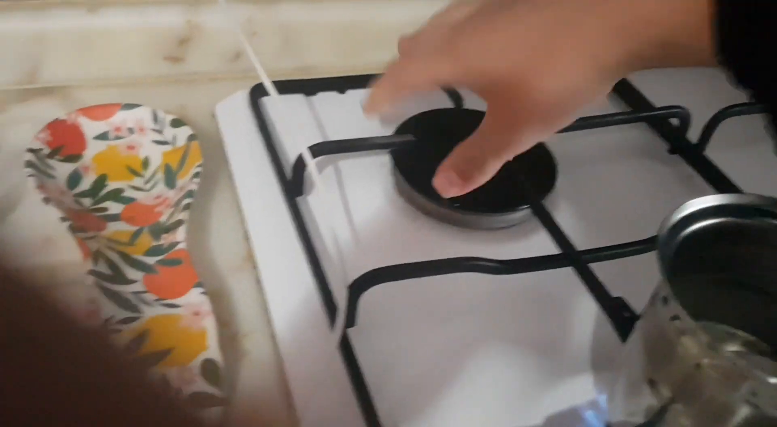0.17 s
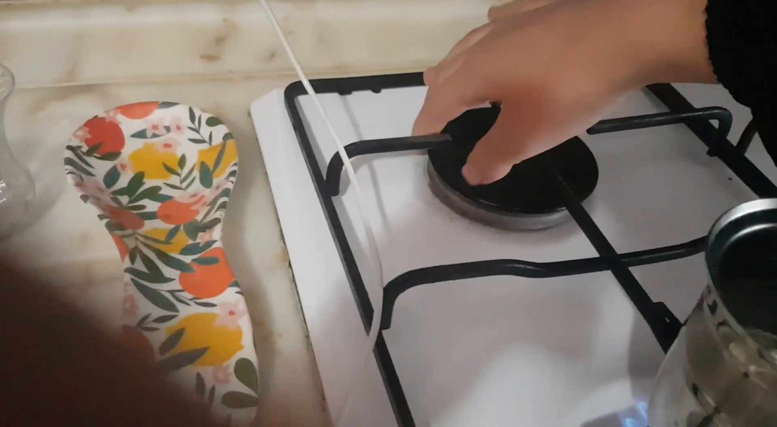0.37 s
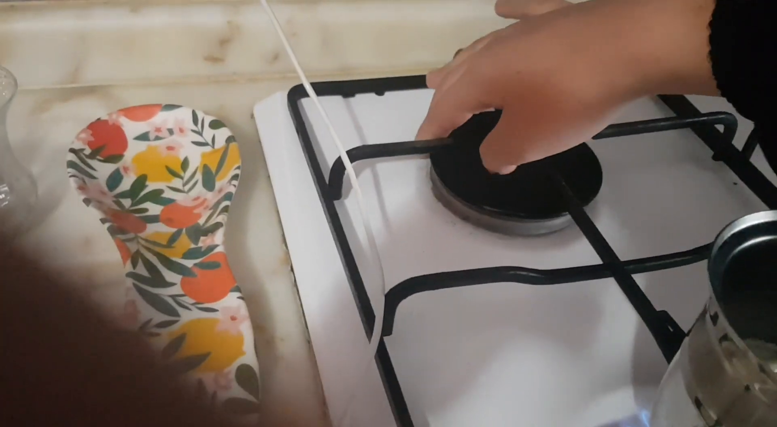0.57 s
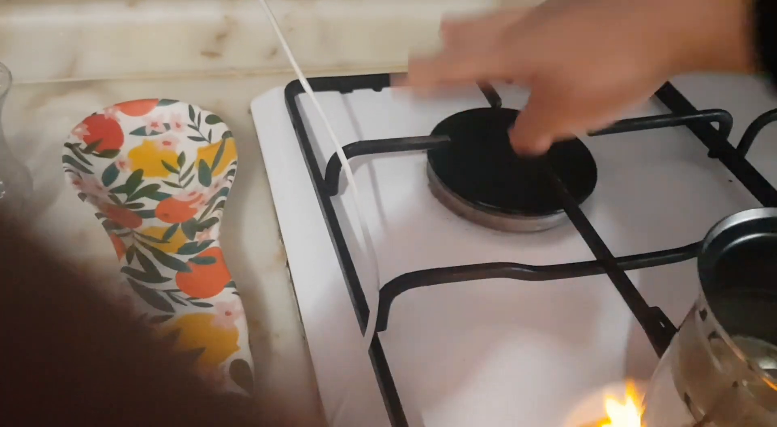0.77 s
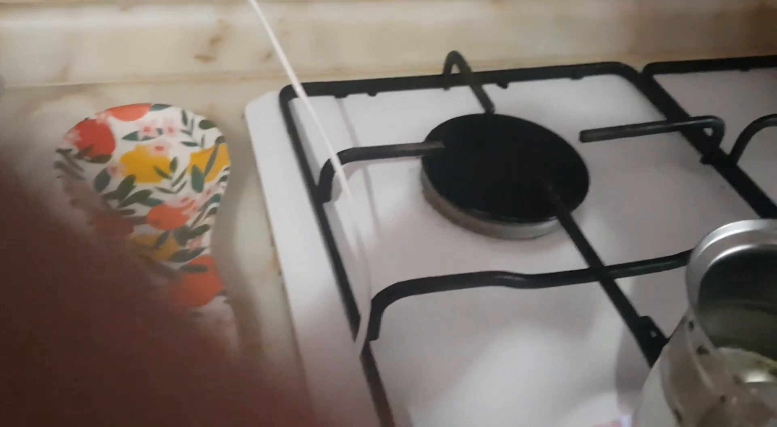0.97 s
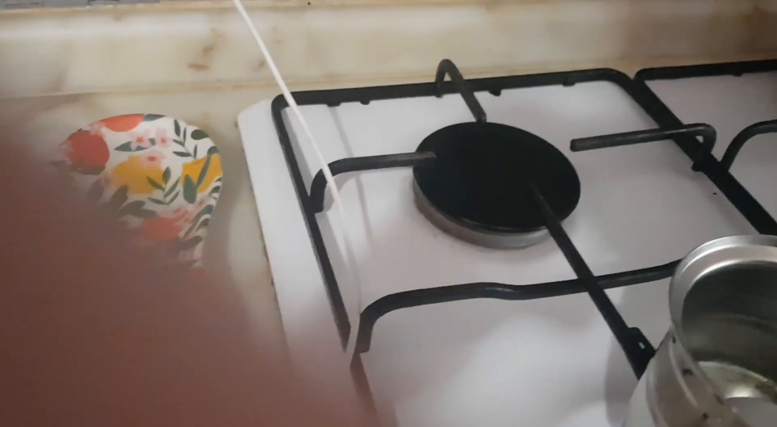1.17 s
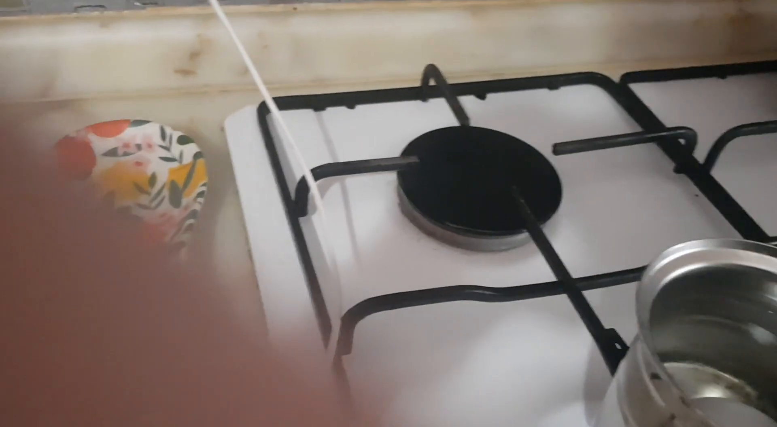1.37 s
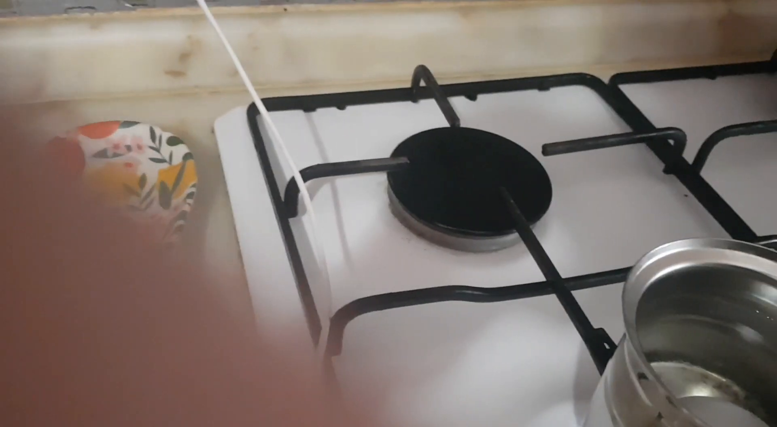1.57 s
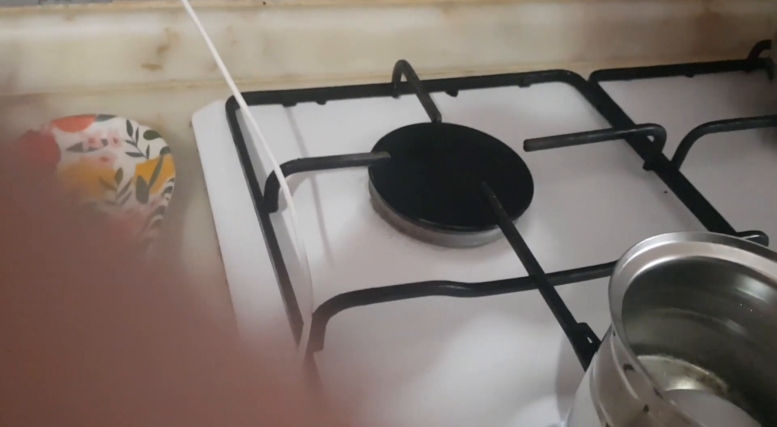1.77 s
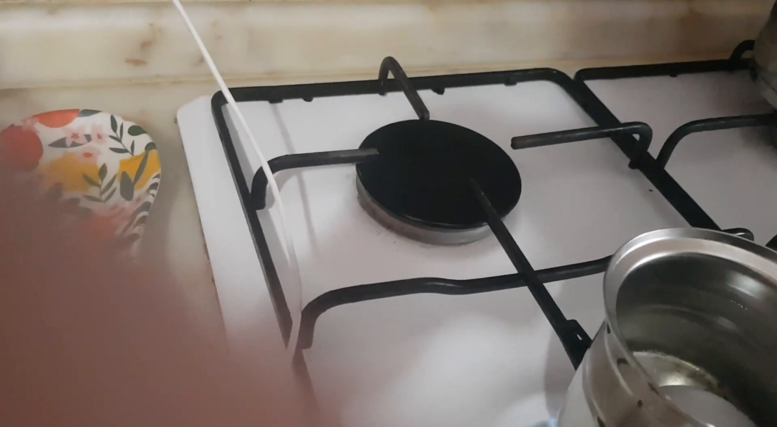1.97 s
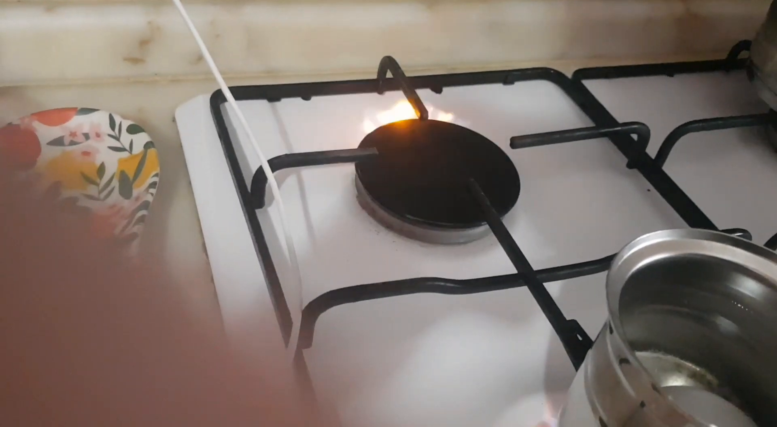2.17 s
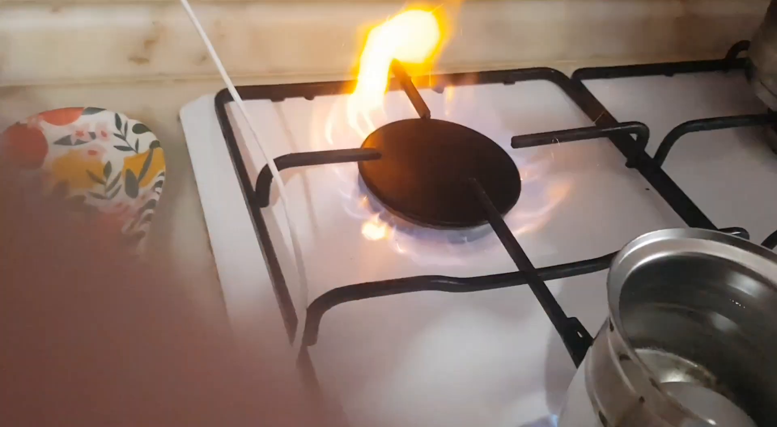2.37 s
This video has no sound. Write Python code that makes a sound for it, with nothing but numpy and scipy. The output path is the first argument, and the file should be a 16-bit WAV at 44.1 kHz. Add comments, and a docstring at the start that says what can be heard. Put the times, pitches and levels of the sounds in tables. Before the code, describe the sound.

Two crisp lighter clicks at a gas burner, heard close in a small quiet kitchen, follow metallic cap knocks, faint knob ticks and a breathy hiss; the gas catches at the second with a fluttering low puff.

```python
"""A small kitchen murmurs, close above a stove, while a hand bumps it: noise with coloured spectra.
A metal cap rocks on a gas burner and drops into its seat: damped modes and dense ringing of cap and hob.
Small knob ticks, then gas hisses with a breathy whistle: broadband jet noise and a resonance of the burner tube.
The spark lighter snaps twice, each a short noise burst with a room tail. At the second snap the gas
lights with a soft whoomp: low noise of evened level under a higher flutter."""
import sys
import numpy as np
from scipy import signal
from scipy.fft import rfft, irfft
from scipy.io import wavfile
from scipy.ndimage import uniform_filter1d

SR = 44100
rng = np.random.default_rng(int(sys.argv[2]) if len(sys.argv) > 2 else 0)


def master_out(mix):
    """Clip the mix to full scale and print it as 16-bit PCM to the path in sys.argv[1]."""
    frames = np.transpose(np.atleast_2d(mix))
    ceiling = np.clip(frames, -1, 1)
    pcm = np.round(ceiling * 32767).astype(np.int16)
    wavfile.write(sys.argv[1], SR, pcm)


N = 106369
T = np.arange(N) / SR  # s
HZ = np.maximum(np.fft.rfftfreq(N, 1 / SR), 1)


def amp(db):
    """Level in decibels to amplitude ratio."""
    return 10 ** (np.asarray(db) / 20)


def over_hz(points, hz=HZ):
    """Interpolation along a logarithmic frequency axis, on which octaves are equal steps."""
    f, value = np.array(sorted(points), float).T
    return np.interp(np.log(hz), np.log(f), value)


def shape(points):
    """Spectral envelope: amplitude per frequency, falling 24 dB per octave past the table's ends."""
    below = np.minimum(HZ / points[0][0], 1) ** 4
    above = np.minimum(points[-1][0] / HZ, 1) ** 4
    return amp(over_hz(points)) * below * above


def hump(hz, octaves):
    """Bandpass envelope: a Gaussian on the octave scale, down to 1/e at this distance from the centre."""
    return np.exp(-(np.log2(HZ / hz) / octaves) ** 2)


# likeness of the two microphone signals: f/Hz, correlation
CHANNEL_CORRELATION = [(60, 0.99), (300, 0.92), (450, 0.87), (630, -0.11), (900, .5), (1200, 0.55),
                       (3000, 0.14), (15000, 0)]


def likeness(hz):
    """Spatial coherence: correlation of left and right at a frequency."""
    return np.clip(over_hz(CHANNEL_CORRELATION, hz), -.99, .99)


def noise(gain):
    """Coloured noise of rms 1: mid and side are weighted to set the correlation of the channels."""
    mid, side = rfft(rng.standard_normal((2, N)))
    alike = likeness(HZ)
    common = mid * np.sqrt(1 + alike)
    opposed = side * np.sqrt(1 - alike) * np.array([[1], [-1]])
    x = irfft(gain * (common + opposed), N)
    return x / x.std()


def decay(age, t60):
    """Exponential damping: the level falls by 60 dB in each t60."""
    return np.exp(-np.log(1000) * age / t60)


def fade(start, t60):
    """Impulsive excitation: sudden onset and exponential decay."""
    return (T >= start) * decay(np.maximum(T - start, 0), t60)


def swell(start, rise, sharpness=1):
    """Transient envelope: a burst that peaks after the rise time and dies away."""
    u = np.maximum(T - start, 0) / rise
    return (u * np.exp(1 - u)) ** sharpness


def ring(gain, start, t60s, size=32768):
    """High modal density: noise in overlapping octave bands, each damped at its own rate."""
    spectrum = rfft(noise(gain)[:, :size])
    hz = np.maximum(np.fft.rfftfreq(size, 1 / SR), 1)
    out, first = np.zeros((2, N + size)), int(start * SR)
    for k in range(5, 15):  # octave centres 32 Hz to 16384 Hz
        band = irfft(spectrum * np.maximum(1 - abs(np.log2(hz) - k), 0), size)
        out[:, first:first + size] += band * decay(T[:size], over_hz(t60s, 2. ** k))
    return out[:, :N]


def chime(modes, start, ring_share=1):
    """Modal superposition: damped sinusoids, their phase lag between microphones set by the correlation."""
    out, age = np.zeros((2, N)), T[T >= start] - start
    for hz, db, t60 in modes:
        lag = rng.choice([-1, 1]) * np.arccos(likeness(hz))
        phase = rng.uniform(-np.pi, np.pi) + lag * np.array([[.5], [-.5]])
        t60 = t60 * ring_share
        t, first = age[age < 2 * t60], N - len(age)
        out[:, first:first + len(t)] += amp(db) * decay(t, t60) * np.sin(2 * np.pi * hz * t + phase)
    return out


# level of the background noise, turned down over time as by a noise suppressor: t/s, level/dB
BACKGROUND_LEVEL = [(0, -49.5), (.7, -49.5), (1.3, -53), (2.0, -55)]
# spectrum of the kitchen's low murmur: f/Hz, relative level/dB
MURMUR_SPECTRUM = [(15, -63), (25, -37), (59, 1.5), (80, 0.5), (97, -9), (153, 0.5), (180, -16),
                   (263, -3.5), (344, -15.5), (405, -10), (439, -16), (575, -17), (863, -40), (2000, -36),
                   (3520, -49.5), (4740, -32.5), (8140, -44.5), (9570, -31.5), (16000, -37.5)]


def murmur():
    """Stationary noise: the kitchen's fixed spectrum, turned down over time as by a noise suppressor."""
    return amp(np.interp(T, *np.array(BACKGROUND_LEVEL).T)) * noise(shape(MURMUR_SPECTRUM))


# dull bumps and rubs of the hand: t/s, level/dB, rise/s, centre f/Hz, 1/e half-width/octaves
HAND_BUMPS = [(0.0, -57.5, 0.026, 970, 1.06), (0.56, -60, 0.043, 1090, 1.83),
              (0.625, -47.5, 0.026, 167.8, 1.5), (1.39, -51, 0.016, 440, 0.57),
              (1.497, -45, 0.021, 238, 1.41), (1.538, -51.5, 0.023, 293, 2.52)]


def hand():
    """Soft contact: the hand brushes and bumps the stove, giving dull noise that swells and dies."""
    out = 0
    for start, db, rise, hz, width in HAND_BUMPS:
        out = out + amp(db) * noise(hump(hz, width)) * swell(start, rise)
    return out


# knocks of the cap on the burner: t/s, level/dB, contact brightness f/Hz, bass cut f/Hz,
# relative crack level/dB, relative level/dB of the cap's own ring, share of its ring time left by the fingers
CAP_KNOCKS = [(0.312, -15, 1600, 90.2, -3, -6.5, .45), (0.333, -24.5, 2600, 85.5, 6.5, -0.5, .45),
              (0.377, -14, 2770, 150, -23, -7.5, .35), (0.3885, -10.5, 2870, 100.4, 12.5, -6, 0.38),
              (0.4478, -15.5, 3148, 200, 9.5, -28, .2), (0.7543, -3.5, 8100, 45, 8, 1, 0.99),
              (0.768, -7, 11000, 120, 1, 5.5, 1)]
# clear modes of the cap: f/Hz, relative level/dB, t60/s when free of the fingers
CAP_RING = [(4492, -38, .2), (4788, -36, .16), (4923, -39, .15), (5601, -35, .15), (6287, -37, .24),
            (6535, -36, .46), (6610, -41, .3), (7746, -47, .18), (8866, -36, .13), (10085, -44, .18),
            (10771, -33, .1), (11835, -38, .12), (12050, -39, .1), (12731, -45, .13), (13400, -44, .09)]


def cap():
    """Contact damping: fingers shorten the cap's ring, which lasts longest once it is let go."""
    out, modes = 0, CAP_RING + partials(count=60)
    for start, db, bright_hz, cut_hz, crack_db, ring_db, ring_share in CAP_KNOCKS:
        own_ring = amp(ring_db - 2) * chime(modes, start, ring_share)
        out = out + amp(db) * (hob_knock(start, bright_hz, cut_hz, crack_db) + own_ring)
    return out


def partials(count):
    """Scattered weak modes: the cap's faint overtones, 10.5 dB weaker per octave."""
    lowest_hz, highest_hz = 4720, 13200
    free_t60_s = 0.16
    hz = rng.uniform(lowest_hz, highest_hz, count)
    return [(f, -40.5 - 10.5 * np.log2(f / lowest_hz), free_t60_s) for f in hz]


# dense ring of hob and pan supports: f/Hz, relative level/dB
HOB_SPECTRUM = [(130, 0.5), (220, -9), (320, -1.5), (420, -2.5), (520, -8.5), (640, -3), (780, -17.5),
                (900, -19.5), (1190, -6.5), (1400, -17), (1800, -22.5), (2150, -20.5), (2420, -10.5),
                (2850, -24), (3400, -14.5), (4000, -22), (4800, -20), (5300, -33.5), (6500, -24.5),
                (7300, -50), (15000, -52)]
# its decay: f/Hz, t60/s
HOB_DECAY = [(70, 0.82), (170, 0.33), (400, 0.37), (1200, 0.32), (3000, 0.28), (6000, .21), (12000, 0.21)]
# clear modes of the sheet-metal hob: f/Hz, relative level/dB, t60/s
HOB_CLEAR_MODES = [(69.4, -30, 0.86), (73.4, -22.5, 1.03), (117.7, -21.5, .45), (153.5, -31, .3),
                   (172.6, -21.5, 0.44), (253.7, -29.5, 0.33), (302, -20.5, 0.37), (399.4, -30.5, .28),
                   (592, -24.5, 0.16), (662, -24.5, 0.18), (1189, -26, 0.089), (1285, -33, 0.13),
                   (2381, -26, 0.17), (3315, -34.5, 0.24)]
# quickly damped modes of the burner body, heard as a clunk: f/Hz, relative level/dB, t60/s
BURNER_MODES = [(378.5, -6, 0.024), (1296, -11, 0.016), (2360, -16.5, .02)]


def hob_knock(start, bright_hz, cut_hz, crack_db):
    """Impact excitation: a duller contact, as in light knocks, drives less treble into burner and hob."""
    body = shape(HOB_SPECTRUM)
    crack = amp(-12.5) * noise(body) * fade(start, t60=0.028) + chime(BURNER_MODES, start)
    dense = amp(-14) * ring(body, start, HOB_DECAY)
    clear = amp(0.5) * chime(HOB_CLEAR_MODES, start)
    onset = np.clip((T - start) / .0012, 0, 1)  # linear rise over 1.2 ms
    x = (amp(crack_db) * crack + dense + clear) * onset
    x = signal.lfilter(*signal.butter(2, bright_hz, fs=SR), x)
    return signal.lfilter(*signal.butter(2, cut_hz, "high", fs=SR), x)


# small ticks of the cap's rim and the gas knob: t/s, level/dB, centre f/Hz
RIM_AND_KNOB_TICKS = [(0.33, -49, 12400), (0.385, -47, 12000), (1.4943, -52.5, 4170), (1.502, -58, 4600),
                      (1.5376, -54, 7600), (1.5488, -54.5, 11200), (1.554, -56, 3460)]


def ticks():
    """Light impact: the cap's rim and the knob give faint bands of decaying noise."""
    out = 0
    for start, db, hz in RIM_AND_KNOB_TICKS:
        out = out + amp(db) * noise(hump(hz, octaves=0.74)) * fade(start, t60=0.16)
    return out


def opening(start):
    """Linear transition from 0 to 1 over 86 ms, as the gas begins to flow or is lit."""
    return np.clip((T - start) / 0.086, 0, 1)


GAS_OPENS_S, LIT_S = 1.589, 2.2
# gas from the jet: f/Hz, relative level/dB
JET_SPECTRUM = [(940, -28), (1600, -15), (1900, -9), (2200, -14.5), (2440, -6), (2720, -6.5), (2960, -1),
                (3390, -6.5), (3700, -3), (4230, -9), (4570, 2), (5540, -15), (5990, -4.5), (6590, -10.5),
                (7190, -4), (7550, -21), (7920, -14), (8640, -10.5), (9060, -13), (10200, -1.5), (10900, 0),
                (11400, 0.5), (12700, -9), (15200, -11), (16000, -18)]


def gas_hiss():
    """Turbulent jet noise: it starts as the valve opens and drops 2.5 dB once lit."""
    level_db = -54 - 2.5 * opening(LIT_S)
    return opening(GAS_OPENS_S) * amp(level_db) * noise(shape(JET_SPECTRUM))


def tube_whistle():
    """Tube resonance: noise in a narrow peak makes a breathy whistle until the gas is lit."""
    centre_hz, half_width_hz = 1166, 95
    tube = 1 / (1 + ((HZ - centre_hz) / half_width_hz) ** 2)
    return opening(GAS_OPENS_S) * (1 - opening(LIT_S)) * amp(-56.5) * noise(tube)


# snaps of the spark lighter: t/s, level/dB
LIGHTER_SNAPS = [(1.7663, -0.5), (2.1850, -1.5)]
# spectrum of snap and room tail: f/Hz, relative level/dB
SNAP_SPECTRUM = [(88, -55), (150, -24), (376, -17.5), (790, -32), (1040, -15.5), (1140, -17.5),
                 (1530, -22.5), (1980, -16), (2500, -15.5), (2870, -12.5), (3620, -6.5), (3920, -13.5),
                 (4860, -7.5), (6020, -10.5), (6640, -1.5), (7040, 1), (8070, -4.5), (8730, -2),
                 (9820, -4.5), (12200, -1.5), (16000, -18)]
# decay of the kitchen's answer: f/Hz, t60/s
ROOM_DECAY = [(300, 0.26), (3000, .22), (7000, 0.19), (14000, 0.15)]


def lighter():
    """Spark impulse and reverberation: a snap of a few milliseconds, answered by the kitchen walls."""
    out, colour = 0, shape(SNAP_SPECTRUM)
    for start, db in LIGHTER_SNAPS:
        snap = amp(-12.5) * noise(colour) * swell(start, rise=.0015, sharpness=0.83)
        room = amp(-21) * ring(colour, start, ROOM_DECAY)
        out = out + amp(db) * (snap + room)
    return out


# course of the catching flame: t/s, rumble level/dB, flutter level/dB
FLAME_COURSE = [(2.183, -59, -80), (2.196, -30.5, -52), (2.24, -35, -52.5), (2.277, -31, -52.5),
                (2.286, -32, -43), (2.33, -31, -40), (2.351, -34.5, -38.5), (2.38, -41, -49.5),
                (2.41, -52, -59)]
# low rumble: f/Hz, relative level/dB
RUMBLE_SPECTRUM = [(18, -51), (30, -21), (60, 2.5), (114, 2.5), (226, -6.5), (278, -1.5), (356, -11),
                   (633, -29.5), (697, -14), (800, -42), (1040, -62), (1760, -120)]
# higher flutter: f/Hz, relative level/dB
FLUTTER_SPECTRUM = [(500, -2.5), (800, -5), (1200, 2.5), (1700, -1.5), (2600, -20.5), (4200, -16),
                    (8000, -27), (15000, -33)]


def flame():
    """Combustion noise: gathered gas burns off in a low, even whoomp, fluttering as flame rounds the cap."""
    s, rumble_db, flutter_db = np.array(FLAME_COURSE).T
    rumble = noise(shape(RUMBLE_SPECTRUM))
    power = uniform_filter1d(np.mean(rumble ** 2, axis=0), int(.02 * SR))  # 20 ms mean
    evenness = .7  # 1 would hold the short-term level constant
    rumble = rumble / power ** (evenness / 2)
    flutter = noise(shape(FLUTTER_SPECTRUM))
    whoomp = amp(np.interp(T, s, rumble_db)) * rumble
    return (T > s[0]) * (whoomp + amp(np.interp(T, s, flutter_db)) * flutter)


def scene():
    """Linear superposition of all sources over the kitchen's low murmur."""
    return murmur() + hand() + cap() + ticks() + gas_hiss() + tube_whistle() + lighter() + flame()


# balance of the two microphones: f/Hz, left minus right level/dB
MICROPHONE_BALANCE = [(60, -2), (200, -0.5), (600, -0.5), (1300, 1), (2400, 3.5), (4400, 7), (15000, 4)]


def record(dry):
    """Band limiting and saturation: left gets more treble, bass is cut, peaks are clipped, then the top is cut."""
    balance_db = over_hz(MICROPHONE_BALANCE) * np.array([[.5], [-.5]])
    ports = irfft(rfft(dry) * amp(balance_db), N)
    ports = signal.lfilter(*signal.butter(2, 25, "high", fs=SR), ports)
    top_cut = signal.ellip(10, .2, 80, 16000, fs=SR, output="sos")  # ripple dB, stopband dB, edge Hz
    return signal.sosfilt(top_cut, np.clip(ports, -1, 1))


dry = scene()
out = record(dry)
master_out(out)
```